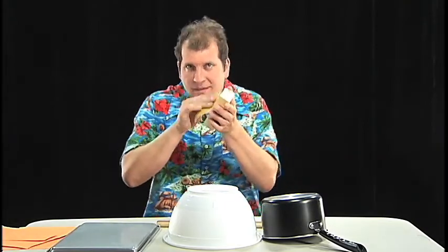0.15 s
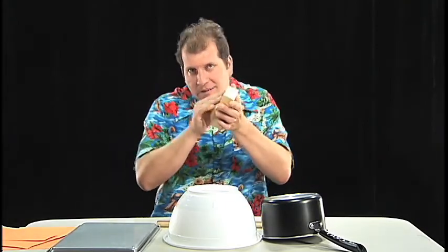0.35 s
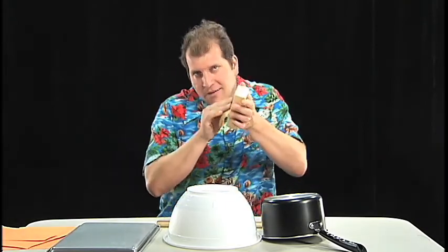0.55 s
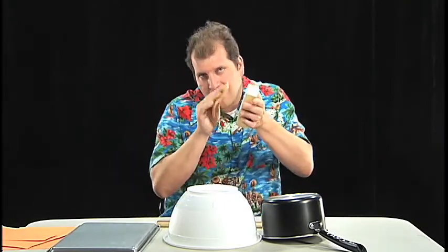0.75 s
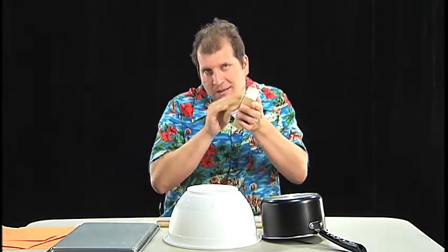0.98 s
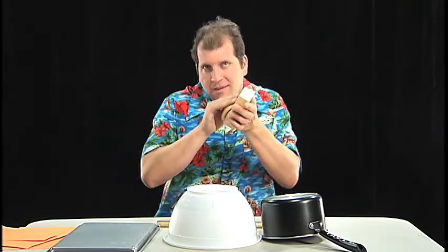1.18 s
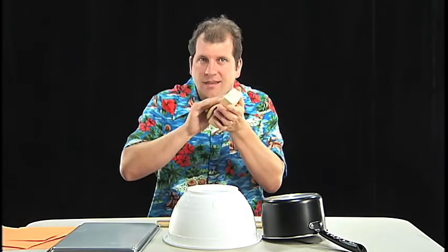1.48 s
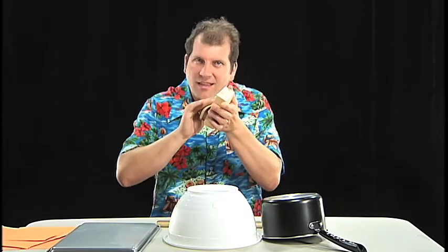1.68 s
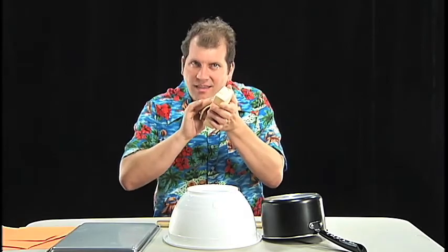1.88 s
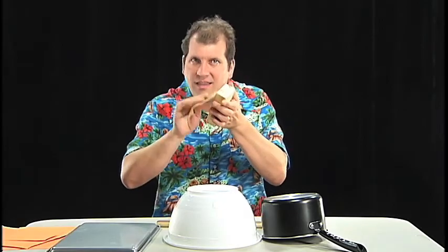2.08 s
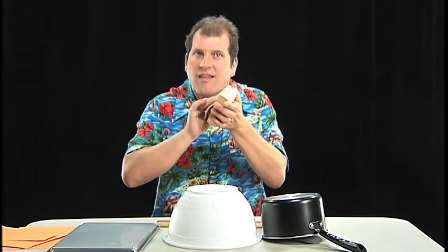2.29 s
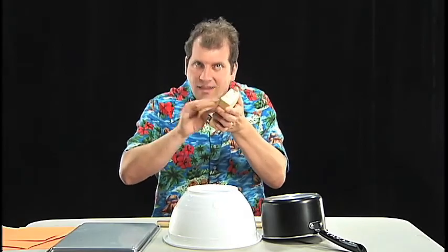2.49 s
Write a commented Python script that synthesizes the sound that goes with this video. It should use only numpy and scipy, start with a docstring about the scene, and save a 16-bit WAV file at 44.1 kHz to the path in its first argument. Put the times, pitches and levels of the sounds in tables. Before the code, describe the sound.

Sandpaper rubs a small wooden block, light slow drags first, then quick, louder raspy strokes

```python
"""A sheet of sandpaper slaps onto a small hand-held wooden block and is dragged lightly, four times over.
Then come seven firm, quick strokes back and forth, close by in a quiet, dry room.
The rasp is a random train of grit catches, its level, density and treble in firm strokes set by speed.
Slaps are bursts of grit with a hollow knock; resonances of block and paper colour all contact sound."""
import sys
import numpy as np
from scipy import signal
from scipy.fft import rfft, irfft, next_fast_len
from scipy.io import wavfile
from scipy.ndimage import uniform_filter1d

SR = 44100
rng = np.random.default_rng(int(sys.argv[2]) if len(sys.argv) > 2 else 0)


def pcm_store(signal):
    """Save signal as 16-bit PCM."""
    levels = np.round(np.clip(np.atleast_2d(signal), -1, 1) * 32767)
    wavfile.write(sys.argv[1], SR, levels.astype(np.int16).T)


N = 116865
TIME = np.arange(N) / SR   # s

# Still air of the room, relative spectral density: (frequency [Hz], density [dB])
AIR_SPECTRUM = [(25, -10), (55, -9), (100, -7), (170, 1), (260, -4), (380, 0.5), (550, -7), (750, -6.5),
                (1200, -10.5), (3000, -19.5), (8000, -19.5), (16000, -33)]
# Reverberant tail, relative spectral density: (frequency [Hz], density [dB])
ROOM_SPECTRUM = [(200, 2), (1500, 1), (4500, -2), (9000, -11.5), (16000, -13.5)]
# Reflections from hands and table, relative to the direct sound: (delay [s], level [dB])
NEAR_REFLECTIONS = [(.0023, -16.5), (.0041, -24.5)]
# Resonances of block and sheet, added to the direct sound: (frequency [Hz], bandwidth [Hz], gain [dB])
BLOCK_MODES = [(1320, 30, -12.5), (1638, 55, 1), (2270, 53, -2.5), (3400, 280, -17), (4240, 130, -12),
               (6430, 220, -6)]
# Hard dragging as motion nears its end: (centre time [s], half length to 1/e [s], relative level [dB])
BRAKING_GRINDS = [(0.685, 0.018, -54.5), (.748, 0.0091, -64), (1.691, 0.019, -47.5), (1.94, .03, -44.5),
                  (2.134, 0.0069, -46), (2.55, 0.0049, -63)]
# Braking sheet, relative spectral density: (frequency [Hz], density [dB])
GRIND_SPECTRUM = [(300, -25), (1000, -15.5), (1500, -2), (2200, -4), (3000, -6), (8000, -11), (16000, -43)]
# Contacts of sheet and block; in a landing the edge touches, then the hand presses the sheet flat:
# (time [s], relative crunch level [dB], crunch decay [s], bass gain [dB], treble gain [dB],
#  knock level [dB], knock frequency [Hz])
SLAP_CONTACTS = [(0.118, -34.5, .0022, 9, -15, -34, 806), (0.1312, -29, 0.0035, 1.5, -2.5, -39.5, 278),
                 (0.3903, -36, 0.0013, -12, -5, -43, 2500), (0.3994, -46, 0.0033, 2, 3, -24.5, 3630),
                 (0.4057, -29.5, 0.0025, -4, -17, -23, 1400), (.9630, -32.5, 0.0036, 5.5, -19, -43, 1530),
                 (.9770, -24.5, 0.0021, 7.5, 2, -42.5, 465), (1.232, -37.5, 0.0029, 14.5, 1, -61, 1590),
                 (1.2457, -31.5, 0.0017, 10, 9, -36.5, 920), (1.2616, -49.5, 0.0022, 20, -13, -42.5, 274),
                 (1.5121, -38.5, 0.0042, 0, 6, -47.5, 400), (1.5289, -39, 0.0032, 2, 16.5, -45.5, 300),
                 (2.3310, -22, 0.0026, -2.5, -2, -38.5, 321)]
# Crunch of a slap, relative spectral density: (frequency [Hz], density [dB])
SLAP_SPECTRUM = [(60, -6), (150, -8), (300, -4), (700, -3), (1300, 2), (2600, -2), (4000, 0.5), (7000, 0.5),
                 (10000, -3.5), (16000, -11)]
# Sliding speed in each light drag, expressed as rasp: one list per drag of (time [s], relative level [dB])
LIGHT_DRAGS = [
    [(.119, -44), (.143, -47), (.152, -43.5), (.19, -41), (.212, -46), (.229, -51), (.241, -48),
     (.261, -54.5), (.27, -68)],
    [(.392, -42.5), (.414, -56.5), (.424, -46), (.444, -44.5), (.49, -48.5), (.6, -47), (.695, -42.5),
     (.712, -49.5), (.731, -70), (.751, -59.5), (.762, -78)],
    [(.964, -42.5), (.992, -50.5), (1.006, -57.5), (1.028, -43), (1.041, -51), (1.05, -61), (1.063, -53.5),
     (1.074, -57), (1.082, -87)],
    [(1.234, -43), (1.246, -41.5), (1.254, -42.5), (1.268, -51), (1.284, -70), (1.298, -43.5), (1.311, -74),
     (1.324, -48), (1.337, -53.5), (1.347, -62)],
]
# The sheet also scuffs lightly beneath the firm strokes: (start [s], end [s], relative level [dB])
STROKE_SCUFFS = [(1.521, 1.718, -46.5), (1.732, 2.026, -56.5), (2.027, 2.147, -52), (2.307, 2.377, -42.5),
                 (2.457, 2.566, -48.5)]
# Light rubbing, relative spectral density: (frequency [Hz], density [dB])
LIGHT_SPECTRUM = [(100, -46.5), (250, -19.5), (500, -9), (1000, -6.5), (2000, -5.5), (4200, 0.5),
                  (7000, -2.5), (10000, -3.5), (16000, -14.5)]
# Firm strokes, level and treble taken at full speed:
# (start [s], fastest [s], end [s], relative level [dB], treble gain [dB])
FIRM_STROKES = [(1.506, 1.573, 1.606, -26.5, 1.5), (1.62, 1.660, 1.72, -27, 0),
                (1.734, 1.791, 1.827, -27, 1), (1.838, 1.872, 1.979, -28, -5),
                (2.021, 2.085, 2.13, -27, 3.5), (2.319, 2.349, 2.4387, -30, 3.5),
                (2.445, 2.511, 2.579, -28, 4)]
# Firm rubbing, relative spectral density: (frequency [Hz], density [dB])
FIRM_SPECTRUM = [(100, -57), (300, -33.5), (700, -28.5), (1100, -20.5), (1700, -11), (2800, -10),
                 (4200, -4), (8000, -1), (11000, -4), (16000, -12)]

AIR_DB, LIGHT_DB, FIRM_DB, SLAP_DB = -71, 1, -0.64, 2
ROOM_DB, ROOM_T60_S, ROOM_DELAY_S = -24, 0.22, 0.02
BASS_CUT_HZ = 214   # so small a block radiates no bass
CUTOFF_HZ = 16000
LIGHT_GRAINS_PER_S, FIRM_GRAINS_PER_S, GRAIN_SPREAD_DB = 16000, 30000, 2.5
JUDDER_HZ, JUDDER_DB = 83.4, 1.05   # bandwidth and rms swing of the uneven grip
SLAP_BASS_HZ, SLAP_EDGE_HZ = 590, 6400   # borders of the bass and treble bands
SLAP_ATTACK_S, KNOCK_CYCLES = 0.00023, 0.54   # the knock envelope peaks after this many cycles
SPEED_POWER = 1.2   # exponent of rasp amplitude against sliding speed
TREBLE_EDGE_HZ, TREBLE_SPEED_DB = 7700, 10   # brighter at full speed than at a turn


def from_db(db):
    """Logarithmic level: twenty decibels are a tenfold amplitude."""
    return 10 ** (np.asarray(db) / 20)


def rms_one(x):
    """Normalisation: division by the root mean square gives unit power."""
    return x / np.sqrt(np.mean(x ** 2) + 1e-20)


def low_pass(x, hz):
    """First-order low-pass: a single pole gives a gentle slope."""
    return signal.sosfilt(signal.butter(1, hz, fs=SR, output="sos"), x)


def colour(x, points):
    """Minimum-phase filtering: a folded cepstrum gives a causal response that keeps white-noise power."""
    size = 2 * next_fast_len(N)
    hz, db = np.transpose(points)
    freqs = np.maximum(np.arange(size // 2 + 1) * SR / size, 1)
    magnitude = rms_one(from_db(np.interp(np.log(freqs), np.log(hz), db)))
    cepstrum = irfft(np.log(magnitude))
    # fold the negative-time half onto the positive
    cepstrum[1:size // 2] *= 2
    cepstrum[size // 2 + 1:] = 0
    response = np.exp(rfft(cepstrum))
    return irfft(rfft(x, size) * response)[:N]


def room_air():
    """Stationary background: white noise is shaped to the spectrum of still room air."""
    return from_db(AIR_DB) * colour(rng.standard_normal(N), AIR_SPECTRUM)


def room(x):
    """Reverberation: two near reflections and a faint, exponentially decaying diffuse tail."""
    decay = from_db(-60 * TIME / ROOM_T60_S) * (TIME > ROOM_DELAY_S)
    tail = colour(rng.standard_normal(N) * decay, ROOM_SPECTRUM)
    tail = tail / np.sqrt(np.sum(tail ** 2))   # unit energy
    near = 0
    for delay_s, db in NEAR_REFLECTIONS:
        near = near + from_db(db) * np.pad(x, (int(delay_s * SR), 0))[:N]
    return x + near + from_db(ROOM_DB) * signal.fftconvolve(x, tail)[:N]


def block(x):
    """Modal resonance: two-pole modes of wood and sheet ring on top of the contact noise."""
    out = x
    for hz, width_hz, gain_db in BLOCK_MODES:
        radius = np.exp(-np.pi * width_hz / SR)   # a wider mode decays sooner
        zeros = (1 - radius * radius) / 2 * np.array([1, 0, -1])
        poles = [1, -2 * radius * np.cos(2 * np.pi * hz / SR), radius * radius]
        out = out + from_db(gain_db) * signal.lfilter(zeros, poles, x)
    return out


def judder():
    """Random modulation: low-passed noise, read in decibels, makes the gain of an uneven grip."""
    sos = signal.butter(2, JUDDER_HZ, fs=SR, output="sos")
    swings = rms_one(signal.sosfilt(sos, rng.standard_normal(N)))
    return from_db(JUDDER_DB * swings)


def grit(per_s):
    """Random impulse train: grains catch and let go, many small clicks and a few large, at unit power."""
    chance = np.clip(per_s / SR, 1e-3, 1)   # per sample
    sizes = from_db(GRAIN_SPREAD_DB * np.minimum(rng.exponential(1, N), 5))
    clicks = sizes * rng.choice([-1, 1], N) * (rng.random(N) < chance)
    return rms_one(clicks / np.sqrt(chance))   # equal power whatever the density


def braking_sheet():
    """Braking friction: the stiff paper grinds coarsely in brief swells as the motion nears its end."""
    level = 0
    for centre, half_s, db in BRAKING_GRINDS:
        level = level + from_db(db) * np.exp(-((TIME - centre) / half_s) ** 2)
    return colour(grit(LIGHT_GRAINS_PER_S) * judder() * level, GRIND_SPECTRUM)


def slaps():
    """Damped impact: each contact is a brief crunch of grit and a hollow knock, damped by the hand."""
    grains = grit(FIRM_GRAINS_PER_S)
    bass, lows = low_pass(grains, SLAP_BASS_HZ), low_pass(grains, SLAP_EDGE_HZ)
    middle, treble = lows - bass, grains - lows
    crunch, knocks = 0, 0
    for start, slap_db, decay_s, bass_db, treble_db, knock_db, knock_hz in SLAP_CONTACTS:
        age = np.maximum(TIME - start, 0)
        attack = 1 - np.exp(-age / SLAP_ATTACK_S)
        burst = from_db(slap_db) * attack * np.exp(-age / decay_s)
        crunch = crunch + burst * (from_db(bass_db) * bass + middle + from_db(treble_db) * treble)
        swell = age * knock_hz / KNOCK_CYCLES
        knock = np.sin(2 * np.pi * knock_hz * age) * swell * np.exp(1 - swell)
        knocks = knocks + from_db(knock_db) * knock
    return from_db(SLAP_DB) * colour(crunch, SLAP_SPECTRUM) + knocks


def light_rubbing():
    """Light sliding friction: grit skims the wood in slow drags and beneath the firm strokes, duller."""
    level = 0
    for drag in LIGHT_DRAGS:
        times, levels_db = np.transpose(drag)
        level = level + from_db(np.interp(TIME, times, levels_db, left=-200, right=-200))
    for start, end, db in STROKE_SCUFFS:
        touching = 1. * ((TIME > start) & (TIME < end))
        level = level + from_db(db) * uniform_filter1d(touching, size=90)   # 2 ms edges
    return from_db(LIGHT_DB) * colour(grit(LIGHT_GRAINS_PER_S) * level * judder(), LIGHT_SPECTRUM)


def firm_strokes():
    """Speed-dependent friction: faster sliding makes the rasp louder, denser and brighter."""
    low_level, treble_level, speeds = 0, 0, 0
    for start, fastest, end, db, treble_db in FIRM_STROKES:
        # the hand speeds up and slows along half a sine, reaching 1 at its fastest
        phase = np.interp(TIME, [start, fastest, end], [0, .5, 1])
        speed = np.abs(np.sin(np.pi * phase))
        stroke = from_db(db) * speed ** SPEED_POWER
        speeds = speeds + speed
        low_level = low_level + stroke
        treble_level = treble_level + stroke * from_db(treble_db + TREBLE_SPEED_DB * (speed - 1))
    grains = grit(FIRM_GRAINS_PER_S * speeds) * judder()
    lows = low_pass(grains, TREBLE_EDGE_HZ)
    rasp = lows * low_level + (grains - lows) * treble_level
    return from_db(FIRM_DB) * colour(rasp, FIRM_SPECTRUM)


def scene():
    """Superposition: contact sounds pass through block and room, and add to the still air."""
    air = room_air()
    contact = braking_sheet() + slaps() + light_rubbing() + firm_strokes()
    bass_cut = signal.butter(2, BASS_CUT_HZ, "high", fs=SR, output="sos")
    contact = signal.sosfilt(bass_cut, contact)
    return (room(block(contact)) + air)[None]


def record(dry):
    """Band limitation: a long symmetric filter cuts the top steeply without phase distortion."""
    top_cut = signal.firwin(401, CUTOFF_HZ, fs=SR)[None]
    return signal.fftconvolve(dry, top_cut, mode="same", axes=1)


dry = scene()
out = record(dry)
pcm_store(out)
```